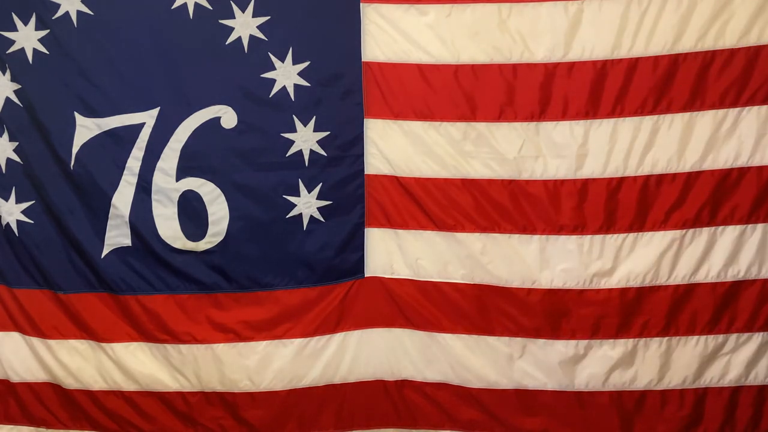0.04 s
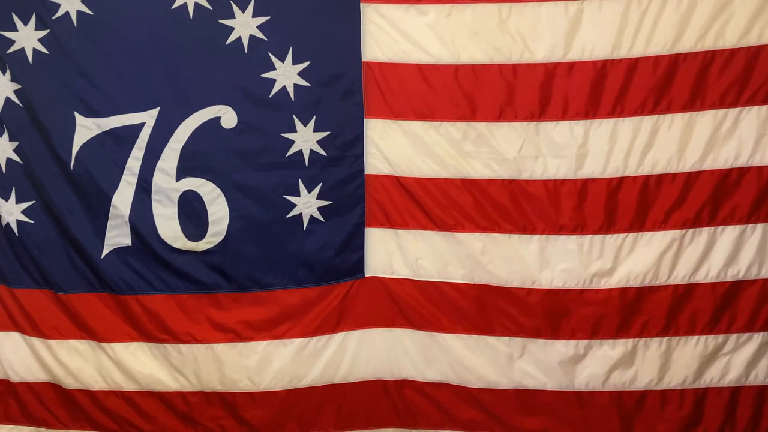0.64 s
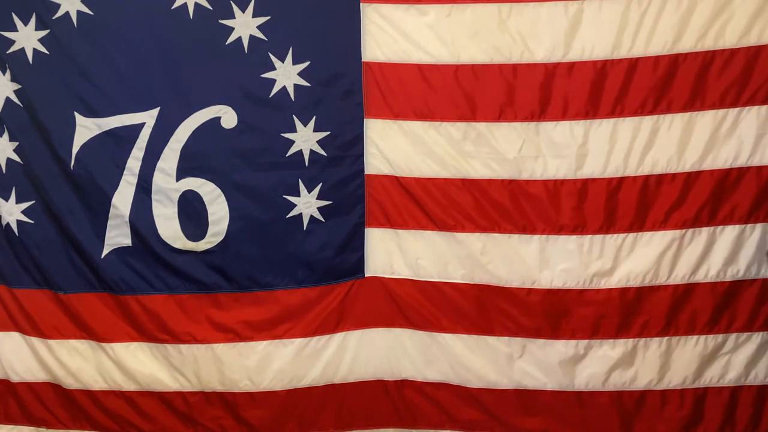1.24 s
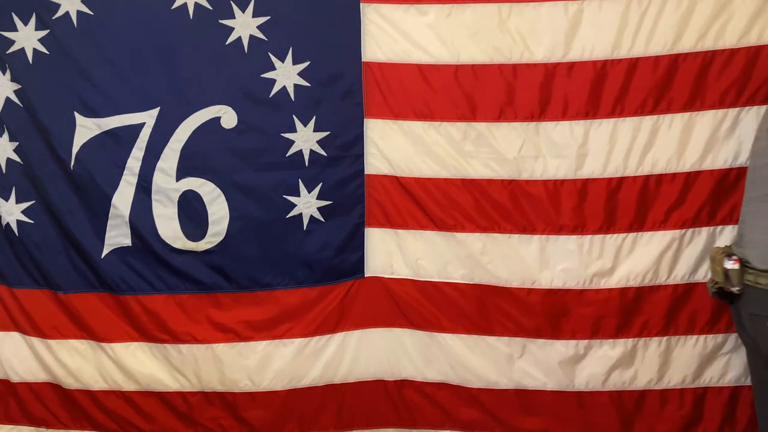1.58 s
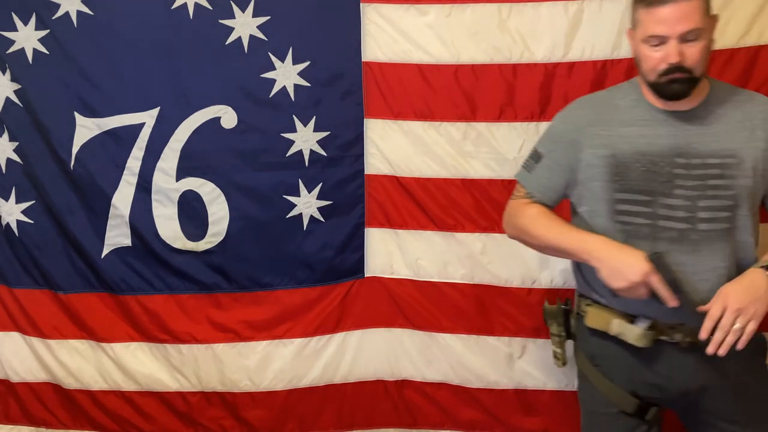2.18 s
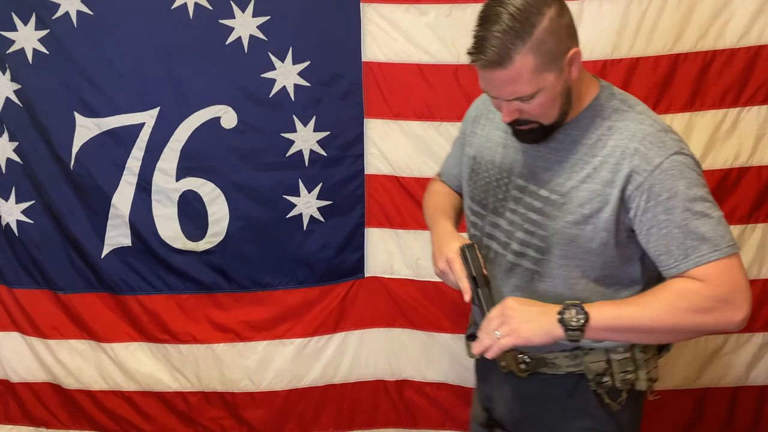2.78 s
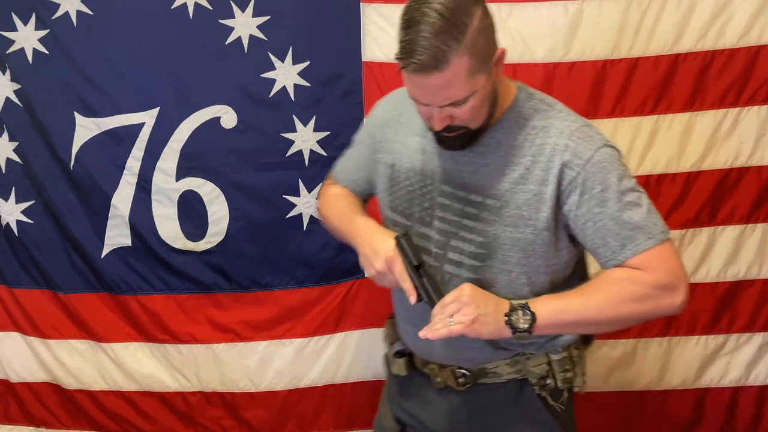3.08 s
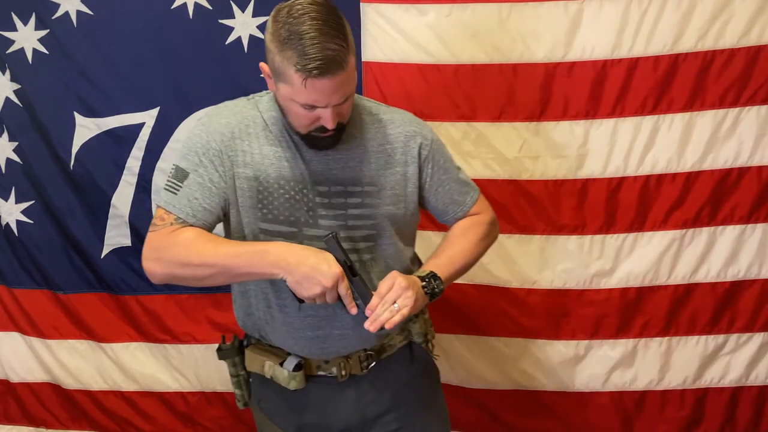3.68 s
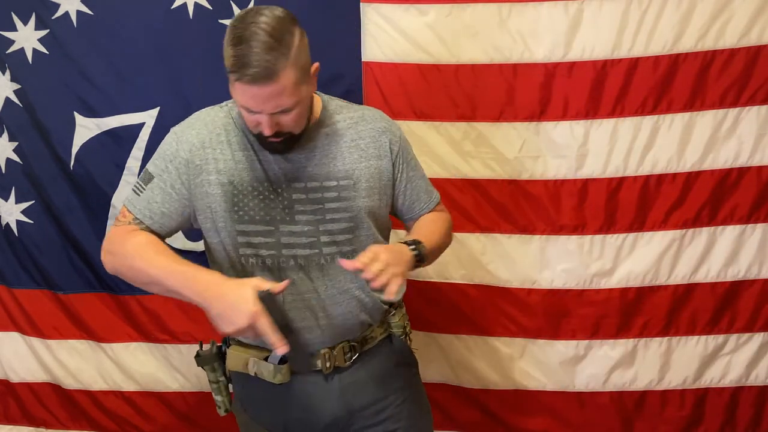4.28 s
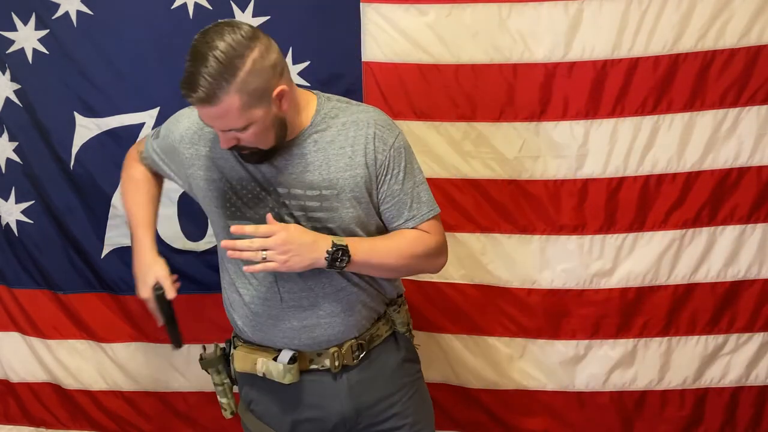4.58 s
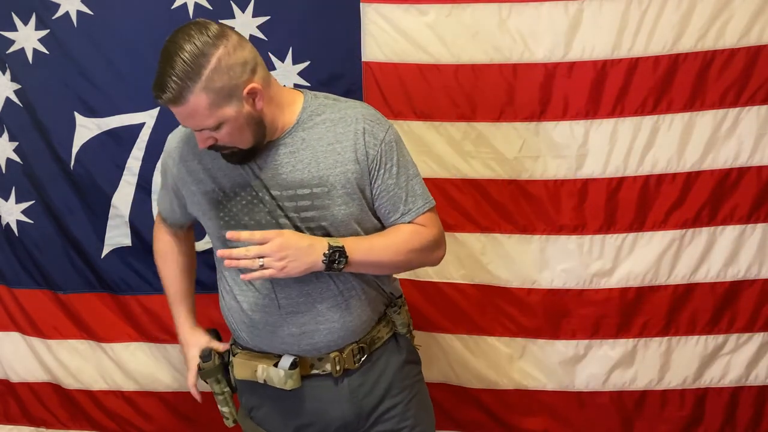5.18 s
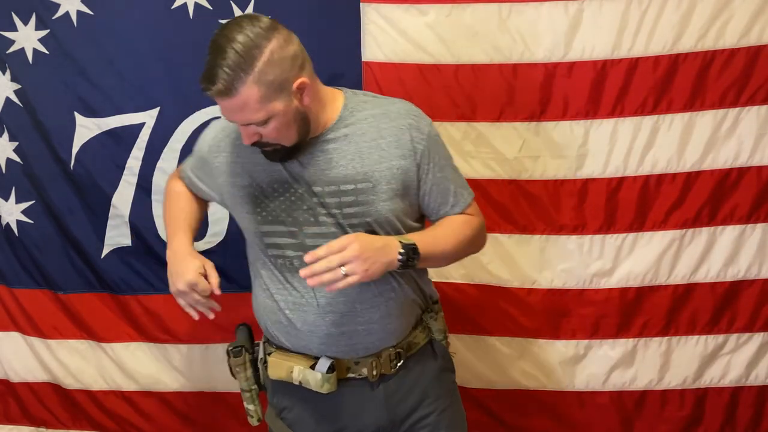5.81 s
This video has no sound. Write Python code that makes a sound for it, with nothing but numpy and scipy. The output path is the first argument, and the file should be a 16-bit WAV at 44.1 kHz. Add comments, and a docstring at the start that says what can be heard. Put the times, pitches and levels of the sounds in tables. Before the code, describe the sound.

A faint, low appliance hum runs throughout in a small room with a short echo. At about 0.2 seconds a shoe scuffs and thuds on the floor, and near 0.9 seconds belt gear gives a sharp click and brief scrape. Soft clothing rustle, faint footfalls and small gear ticks follow until about 3 seconds. From 3.1 to 3.4 seconds a pistol's slide is drawn back with metallic clicks and a thin spring rasp. At 4.1 seconds it slams shut with a bright, briefly ringing steel clack, the loudest moment. The pistol taps a hard plastic holster at 4.9 seconds, then rubs in with hollow clacks and seats with a small thump around 5.3 seconds. After a light flick, the holster's retention hood snaps shut sharply at about 5.8 seconds. The pistol and holster sound slightly left of centre.

```python
"""A scuffing footfall sounds over an appliance's low hum: a man steps into a small room, clothes rustling.
He draws back the slide of a pistol and lets it slam shut, pushes the pistol into a hard plastic belt
holster and snaps the retention hood over it. Each impact or stroke of friction is a broadband
excitation, filtered by the resonances of the body it acts on. The walls reverberate briefly,
and a two-port microphone picks up the sound."""
import sys
import numpy as np
from scipy import signal
from scipy.fft import rfft, irfft, next_fast_len
from scipy.io import wavfile
from scipy.ndimage import map_coordinates

SR = 44100
rng = np.random.default_rng(int(sys.argv[2]) if len(sys.argv) > 2 else 0)


def dump_mix(stems):
    """Bounce the given channels to the path in sys.argv[1] as a 16-bit WAV at rate SR."""
    frames = np.atleast_2d(stems).T  # one column per channel
    limited = np.clip(frames, -1, 1)  # hard clip at full scale
    pcm = np.round(limited * 32767).astype(np.int16)
    wavfile.write(sys.argv[1], SR, pcm)


N = 266805
TIME = np.arange(N) / SR
RING_TIME = TIME[:SR]  # time since an impact [s]

# Levels are relative. A crack is the direct sound of an impact, set against its reverberation.
# slow dips of the background: (time [s], level [dB])
BACKGROUND_DIPS = [(0, -2), (2.8, 0), (3.4, -0.5), (3.9, -5.5), (4.12, -6), (4.3, -2), (6.05, -7.5)]
# movements that swish the clothes: (peak time [s], level [dB], half length [s])
SWISHES = [(.01, -67, 0.031), (.08, -62.5, 0.041), (.83, -65.5, 0.055), (1.4, -64.5, 0.14),
           (1.58, -66.5, 0.11), (1.87, -67.5, 0.11), (1.95, -66.5, 1), (2.12, -59, 0.067),
           (2.64, -57, 0.18), (2.92, -58.5, 0.093), (3.48, -55, 0.19), (3.645, -57.5, 0.072),
           (4.55, -73, 0.13)]
# low thuds: footfalls, the dull clunks of the slide being drawn back, the pistol's thump into the holster:
# (time [s], level [dB], boom frequency [Hz], boom gain [dB])
LOW_THUDS = [(0.185, -37, 117, 13), (.205, -34, 170, 8), (.244, -31, 440, -2), (.285, -34.5, 114, 11.5),
             (1.445, -64, 244, 13), (1.57, -60, 490, 8), (1.944, -55, 440, 17.5), (2.617, -48, 514, 13),
             (3.195, -46, 397, 4), (3.262, -49, 391, 12.5), (3.575, -56.5, 448, 14.5), (5.258, -40, 470, 0)]
# impacts of belt gear and of slide on frame: (time [s], level [dB], tilt [dB/octave], crack [dB])
GEAR_HITS = [(.163, -44.5, 6, 2.5), (.926, -33, 1, 6), (.930, -32, 2, 6.5), (.945, -42, 1.5, 18.5),
             (1.498, -51, -1.5, 6.5), (2.088, -60.5, 7.5, 18), (2.205, -64, -3.5, 11),
             (2.885, -60, 2.5, 13.5), (2.941, -63.5, 8, 12), (2.995, -60.5, -4.5, 11), (3.078, -57, -1, -9)]
SLIDE_HITS = [(3.139, -47, -0.5, 10.5), (3.165, -47.5, -2.5, 5), (3.1855, -29.5, 5, 8.5),
              (3.199, -33, 0.5, 15.5), (3.2715, -35.5, 0, 8.5), (3.332, -46.5, -7, 14.5),
              (3.386, -42, -6, 16), (4.074, -37, 2, 6), (4.087, -37.5, -4, -5.5), (4.1005, -16, 7, 12.5),
              (4.106, -21, -1.5, 15), (4.1185, -27, 3.5, 6)]
# pistol against holster: (time [s], level [dB], tilt [dB/octave], crack [dB], cavity gain [dB])
HOLSTER_HITS = [(4.9067, -26, -1, 0, 14.5), (4.942, -32, 2, 3, 16.5), (4.970, -40, -2, 11.5, 21),
                (5.120, -46.5, 1.5, 10, 16), (5.151, -41, 1.5, 7.5, 6), (5.180, -31, 0, 10, 27),
                (5.186, -32.5, 3.5, 0, 14), (5.246, -20, 5.5, 2.5, 28), (5.266, -28, -2, -2, -3),
                (5.325, -30, 5, 11.5, 10), (5.331, -27, 1, 10.5, 13)]
# the hood is flicked and snaps shut: (time [s], level [dB], crack [dB])
HOOD_HITS = [(5.6456, -38, 6.5), (5.677, -43.5, 13.5), (5.770, -20.5, 10.5), (5.776, -18, 9.5)]

# strokes of sliding contact: (time [s], length [s], final level [dB], swell [dB])
SOLE_SCUFF = [(.16, 0.079, -34.5, 3.5)]
GEAR_RUB = [(.914, .013, -38, 15), (1.024, 0.065, -52, -2)]
HOLSTER_RUB = [(4.886, 0.022, -48, 20), (5.12, 0.053, -47, 4.5), (5.234, 0.059, -24, 6),
               (5.3, .045, -35, -2)]
HOOD_SWING = [(5.738, 0.036, -33, 22)]
SLIDE_PULL = [(3.16, 0.032, -32, 10), (3.216, .052, -35, 4.5)]
SLIDE_RUN = [(4.052, .047, -23, 28)]
SPRING_RUB = [(3.136, 0.016, -47, 5), (3.167, .04, -31.5, 5), (3.207, 0.042, -37.5, -1.5),
              (5.12, 0.18, -37.5, 17)]  # the recoil spring, during the pull and again in the holster

# broad spectrum that each source radiates: (frequency [Hz], level [dB])
AIR_SPECTRUM = [(20, -31.5), (50, 1.5), (95, 1.5), (150, -3), (260, -2.5), (500, -9), (1200, -17),
                (4000, -31), (15000, -40)]
THUD_SPECTRUM = [(30, -27), (60, -18), (100, -13), (170, -9), (290, 1), (500, -1.5), (900, -2.5),
                 (1500, -10.5), (2200, -22), (6000, -31.5), (16000, -72.5)]
CLOTH_SPECTRUM = [(100, -12.5), (400, 3.5), (900, 2), (2000, -1), (5000, -2.5), (8500, -10), (12000, -10.5),
                  (15500, -18), (16500, -32.5)]
GEAR_SPECTRUM = [(100, -33), (300, -22), (700, -6), (1500, -0.5), (2500, -2.5), (3600, 1.5), (6000, -12),
                 (10500, -17.5), (15000, -25), (16500, -40)]
BELT_SPECTRUM = [(100, -27), (160, -33), (210, -3.5), (300, -7.5), (380, 1.5), (470, -9), (580, 0),
                 (800, 3.5), (1400, -27), (6000, -49)]
HOLSTER_SPECTRUM = [(140, -35), (220, -13), (580, -4.5), (700, -11.5), (850, 0), (1400, -1.5), (2500, 0.5),
                    (3800, -1), (4700, -5.5), (7000, -9.5), (11000, -16.5), (15000, -23.5), (16500, -42)]
HOOD_SPECTRUM = [(100, -37.5), (300, -23), (600, -4.5), (1100, 0.5), (1350, -1.5), (1600, 1.5),
                 (2500, -0.5), (3200, -0.5), (4700, -3.5), (7000, -11.5), (11000, -14.5), (15000, -22.5),
                 (16500, -40)]
SPRING_SPECTRUM = [(200, -46.5), (3000, -34), (5400, 3), (8000, -23), (14000, -11.5), (16500, -36.5)]
STEEL_SPECTRUM = [(90, -53.5), (280, -22), (420, -16.5), (700, -8), (1600, 3.5), (2600, 5), (4000, 4),
                  (6000, -2), (7000, -0.5), (8200, -6), (10600, -7), (15200, -13), (16500, -15.5)]

# resonances of each body: (frequency [Hz], bandwidth [Hz], gain [dB])
GEAR_PEAKS = [(444, 130, 5), (880, 110, 4.3), (1400, 230, 3.6), (1625, 120, 8.1), (1987, 48, 2.6),
              (2470, 150, 5.7), (3310, 47, 4.1)]
HOLSTER_SHELL_PEAKS = [(1065, 310, 8.9), (2460, 120, 8.8), (3980, 220, 1), (5130, 170, 2.4)]
HOLSTER_RIM_PEAKS = [(377, 19, 8.7), (1147, 49, 12), (1920, 230, 2.7), (2717, 100, 5.4), (3500, 44, 8.6),
                     (5400, 56, 1.7)]
HOOD_PEAKS = [(878, 100, 11), (1085, 64, 7.6), (2050, 87, 3), (2500, 190, 6.4), (4620, 130, 2.8)]
SPRING_PEAKS = [(5517, 170, 20), (13800, 250, 19)]
FRAME_PEAKS = [(1730, 37, 9.5), (1875, 26, 5.5), (3660, 87, 4), (4137, 80, 5), (5230, 86, 9.5),
               (10630, 230, 3)]
# modes of the air in the filled holster and of the pistol: (frequency [Hz], level [dB], t60 [s])
CAVITY_MODES = [(803, -36.5, 0.36), (857, -31, 0.35), (980, -35, 0.23)]
PISTOL_MODES = [(1693, -44, 0.25), (1830, -34, 0.2), (3500, -43, .3), (4030, -31.5, .3),
                (4400, -49.5, 0.74), (5310, -43, 0.49), (6800, -43, .27), (7700, -55, 0.36),
                (8129, -61, 0.78), (8600, -62.5, 0.87), (10500, -35.5, 0.27)]

# reverberation time of the room: (frequency [Hz], t60 [s])
ROOM_T60 = [(100, 1), (300, 0.48), (600, 0.44), (1000, 0.37), (2500, 0.31), (5000, 0.29), (9000, 0.23),
            (15000, 0.17)]
# likeness of a diffuse sound at the two ports: (frequency [Hz], coherence [0 to 1])
PORT_COHERENCE = [(100, .9), (250, .55), (500, .15), (1000, .05), (4500, 0), (7000, .45), (9500, .7),
                  (11000, .93), (16000, .88)]
# phase difference between the ports: (frequency [Hz], lead of the left [rad])
PORT_PHASE = [(600, 0), (7000, 0), (9200, -3.1), (10700, -6.2), (11600, -6.3), (13300, -9.4),
              (15000, -12.5)]


def amp(db):
    """Amplitude ratio of a level in decibels."""
    return 10 ** (np.asarray(db) / 20)


def unit(x):
    """The signal normalised to an rms of 1."""
    return x / np.sqrt(np.mean(x ** 2) + 1e-20)


def along(points, hz):
    """Interpolation of (frequency [Hz], value) points on a logarithmic frequency axis."""
    freqs, values = np.transpose(points)
    return np.interp(np.log(hz + 1), np.log(freqs + 1), values)


def wobble(rate):
    """Smooth random modulation with `rate` knots a second."""
    return map_coordinates(rng.standard_normal(int(TIME[-1] * rate) + 4), [TIME * rate])


def add(track, start, sound):
    """Superposition: the sound adds to the track from `start` seconds on."""
    part = track[:, round(start * SR):][:, :sound.shape[1]]
    part += sound[:, :part.shape[1]]


def coloured(x, spectrum, tilt=0, peaks=(), knee_hz=300):
    """Source and filter: a body of unit power gain, with resonances and a tilt above the knee."""
    size = 2 * next_fast_len(x.shape[1] // 2 + 4096)
    hz = np.fft.rfftfreq(size, 1 / SR)
    gain = amp(along(spectrum, hz) + tilt * np.log2(np.maximum(hz, knee_hz)))
    resonances = sum(amp(db) ** 2 / (1 + (2 * (hz - centre) / width) ** 2) ** 1.5
                     for centre, width, db in peaks)
    gain *= np.sqrt(1 + resonances)
    # folding the cepstrum gives a causal, minimum-phase response
    cepstrum = irfft(np.log(unit(gain) + 1e-6))
    cepstrum[1:size // 2] *= 2
    cepstrum[size // 2 + 1:] = 0
    return irfft(rfft(x, size) * np.exp(rfft(cepstrum)))[:, :x.shape[1]]


def knock(crack_db, crack_t60=0.018, build_s=0.001, attack_s=0.0007):
    """Impulse response: a direct crack, then a diffuse field in which the treble decays first."""
    hz, t, bands = signal.stft(rng.standard_normal((2, len(RING_TIME))), SR, nperseg=256)
    decay = amp(-60 * t / along(ROOM_T60, hz)[:, None])
    tail = signal.istft(bands * decay, SR, nperseg=256)[1][:, :len(RING_TIME)]
    crack = rng.standard_normal(tail.shape) * amp(crack_db - 60 * RING_TIME / crack_t60)
    return crack * (1 - np.exp(-RING_TIME / attack_s)) + tail * (1 - np.exp(-RING_TIME / build_s))


def friction(envelope, grain_db, grain_rate):
    """Stick-slip friction: noise broken into tiny random catches."""
    catches = unit(amp(grain_db * wobble(grain_rate)))
    return catches * envelope * rng.standard_normal((2, N))


def stroke_envelope(strokes, attack_s=0.0071, release_t60=.075):
    """Friction follows sliding speed: each stroke takes hold, swells or eases, and lets go."""
    envelope = np.zeros(N)
    for start, length, db, swell_db in strokes:
        t = TIME - start
        swell = swell_db * (np.clip(t / length, 0, 1) - 1)
        release = -60 * np.maximum(t - length, 0) / release_t60
        envelope += np.clip(t / attack_s, 0, 1) * amp(db + swell + release)
    return envelope


def rub(strokes, grain_db, direct_db):
    """Friction noise arrives as direct sound plus a reverberant field."""
    force = friction(stroke_envelope(strokes), grain_db, grain_rate=500)
    room = knock(crack_db=0)
    walls = signal.fftconvolve(force, room / np.linalg.norm(room[0]), axes=1)[:, :N]
    return (walls + amp(direct_db) * force) / np.hypot(1, amp(direct_db))


def blows(hits, spectrum, peaks, knee_hz):
    """Impact excitation: contacts share one body's resonances, each with its own brightness and crack."""
    out = np.zeros((2, N))
    for start, db, tilt, crack_db in hits:
        add(out, start, amp(db) * coloured(knock(crack_db), spectrum, tilt, peaks, knee_hz))
    return out


def hollow_blows(hits, spectrum, width_hz, peaks=()):
    """Impact excitation: each contact also drives a hollow resonance of its own pitch."""
    out = np.zeros((2, N))
    for start, db, tilt, crack_db, hz, boom_db in hits:
        resonances = [*peaks, (hz, width_hz, boom_db)]
        add(out, start, amp(db) * coloured(knock(crack_db), spectrum, tilt, resonances))
    return out


def ringing(hits, modes, waver_rad):
    """Free decay of modes after the hardest contact; reflections make the phase waver at each port."""
    out = np.zeros((2, N))
    start = max(hits, key=lambda hit: hit[1])[0]
    for hz, db, t60 in modes:
        onset_phase = rng.uniform(0, 2 * np.pi, (2, 1))
        phase = onset_phase + waver_rad * np.array([wobble(30), wobble(30)])[:, :len(RING_TIME)]
        add(out, start, amp(db - 60 * RING_TIME / t60) * np.sin(2 * np.pi * hz * RING_TIME + phase))
    return out


def background(air_db=-65, hum_hz=119.3, hum_db=-66.0):
    """Noise floor: low room noise and an appliance hum, slightly modulated in amplitude and phase."""
    hum = unit((1 + .2 * wobble(20)) * np.sin(2 * np.pi * hum_hz * TIME + .4 * wobble(14)))
    air = amp(air_db) * coloured(rng.standard_normal((2, N)), AIR_SPECTRUM)
    dips = amp(np.interp(TIME, *np.transpose(BACKGROUND_DIPS)))
    return (air + amp(hum_db) * hum) * dips


def clothes():
    """Cloth friction: bell-shaped swells, one a movement, add in power as incoherent sources do."""
    power = sum((amp(db) * np.exp(-((TIME - peak) / half) ** 2)) ** 2 for peak, db, half in SWISHES)
    return coloured(friction(np.sqrt(power), grain_db=1, grain_rate=150), CLOTH_SPECTRUM)


def walker():
    """Friction and impact in walking: a sole scuffs, cloth rustles, belt gear scrapes and ticks."""
    scuff = coloured(rub(SOLE_SCUFF, grain_db=5, direct_db=-5.5), CLOTH_SPECTRUM, tilt=-1.3)
    rustle = clothes()
    gear_friction = rub(GEAR_RUB, grain_db=1.5, direct_db=7.5)
    scrape = coloured(gear_friction, GEAR_SPECTRUM, tilt=1, peaks=[(2960, 480, 4.8)])
    ticks = blows(GEAR_HITS, GEAR_SPECTRUM, GEAR_PEAKS, knee_hz=903)
    return ticks + scrape + scuff + rustle


def low_thuds(crack_db=0, tilt=.6):
    """Damped low resonances: footfalls, clunks of the drawn slide, the pistol's thump into the holster."""
    hits = [(start, db, tilt, crack_db, hz, boom_db) for start, db, hz, boom_db in LOW_THUDS]
    return hollow_blows(hits, THUD_SPECTRUM, width_hz=100)


def holster(enters_s=5.18, seated_s=5.327, open_hz=1064, filled_hz=852, thump_db=-37.0):
    """Cavity resonance: the holster's note falls as the pistol taps and rubs in, seating with a thump."""
    wall_friction = rub(HOLSTER_RUB, grain_db=2.5, direct_db=0)
    sliding = coloured(wall_friction, HOLSTER_SPECTRUM, tilt=0.33, peaks=HOLSTER_SHELL_PEAKS)
    taps = []
    for start, db, tilt, crack_db, cavity_db in HOLSTER_HITS:
        cavity_hz = np.interp(start, [enters_s, seated_s], [open_hz, filled_hz])
        taps.append((start, db, tilt, crack_db, cavity_hz, cavity_db))
    out = sliding + hollow_blows(taps, HOLSTER_SPECTRUM, width_hz=166, peaks=HOLSTER_RIM_PEAKS)
    add(out, seated_s, amp(thump_db) * coloured(knock(crack_db=23), BELT_SPECTRUM))
    return out


def hood(neutral_db=-28, tilt_per_db=.5):
    """The hood swings and snaps shut, brighter the harder the impact, exciting the holster's air modes."""
    swing_friction = rub(HOOD_SWING, grain_db=2, direct_db=1.0)
    swing = coloured(swing_friction, HOOD_SPECTRUM, tilt=-1, peaks=HOOD_PEAKS)
    hits = [(start, db, tilt_per_db * (db - neutral_db), crack_db) for start, db, crack_db in HOOD_HITS]
    snaps = blows(hits, HOOD_SPECTRUM, HOOD_PEAKS, knee_hz=2600)
    return swing + snaps + ringing(HOOD_HITS, CAVITY_MODES, waver_rad=0.43)


def pistol():
    """Drawn against its spring, the slide runs forward; the impact sets the steel in free vibration."""
    pull = coloured(rub(SLIDE_PULL, grain_db=0.0, direct_db=5.5), STEEL_SPECTRUM, tilt=-1.2)
    spring = coloured(rub(SPRING_RUB, grain_db=3, direct_db=8.5), SPRING_SPECTRUM, peaks=SPRING_PEAKS)
    spring *= amp([[3], [-3]])  # louder on the left
    run = coloured(rub(SLIDE_RUN, grain_db=1, direct_db=1.5), STEEL_SPECTRUM, tilt=-2.1)
    contacts = blows(SLIDE_HITS, STEEL_SPECTRUM, FRAME_PEAKS, knee_hz=900)
    return pull + spring + run + contacts + ringing(SLIDE_HITS, PISTOL_MODES, waver_rad=.9)


def scene():
    """Superposition of all sources at the two ports, with pistol, holster and hood slightly to the left."""
    return (pistol() + holster() + hood()) * amp([[.4], [-.4]]) + walker() + low_thuds() + background()


def record(dry, band_limit_hz=16100):
    """Coherence: the ports share bass and top treble; the treble is phase-shifted and band-limited."""
    size = next_fast_len(N + 8192)
    hz = np.fft.rfftfreq(size, 1 / SR)
    left, right = rfft(dry, size)
    bleed = np.arcsin(np.clip(along(PORT_COHERENCE, hz), 0, 1)) / 2
    pair = np.cos(bleed) * np.array([left, right]) + np.sin(bleed) * np.array([right, left])
    left_lead = np.interp(hz, *np.transpose(PORT_PHASE))
    shift = np.exp(1j * left_lead * np.array([[.5], [-.5]]))
    low_pass = 1 / np.sqrt(1 + (hz / band_limit_hz) ** 160)
    return irfft(pair * shift * low_pass, size)[:, :N]


dry = scene()
out = record(dry)
dump_mix(out)
```